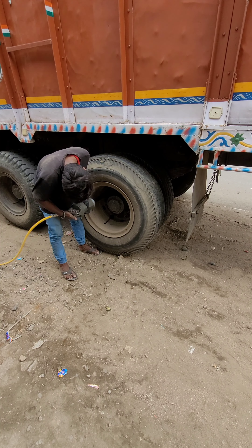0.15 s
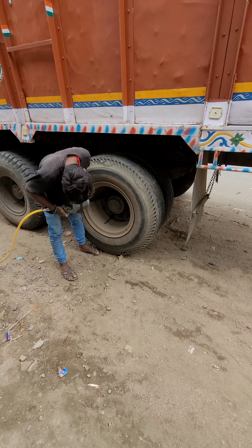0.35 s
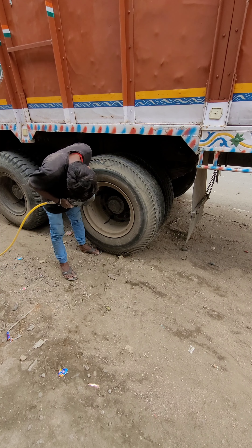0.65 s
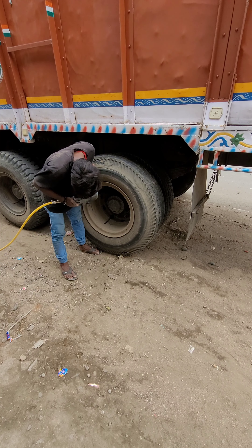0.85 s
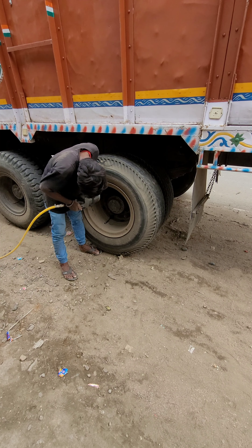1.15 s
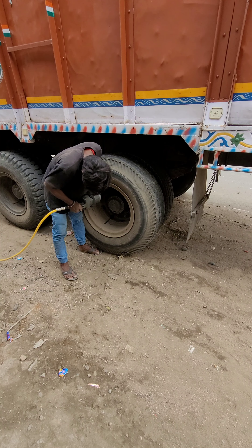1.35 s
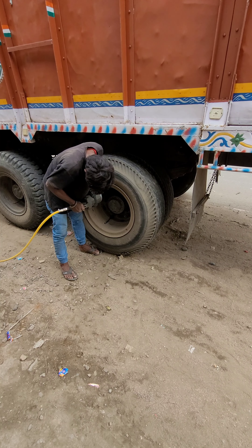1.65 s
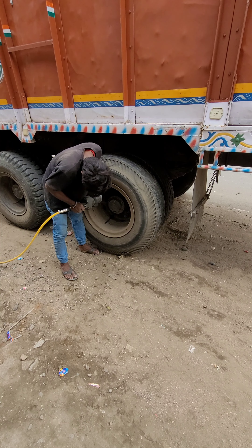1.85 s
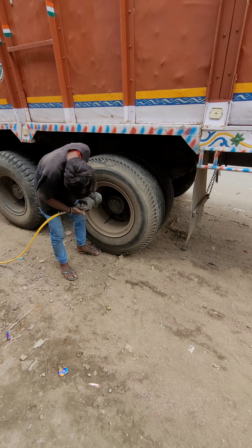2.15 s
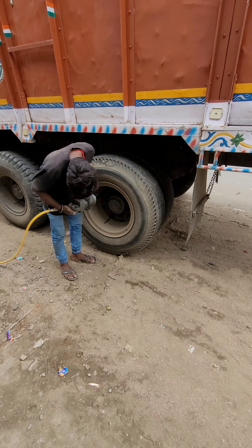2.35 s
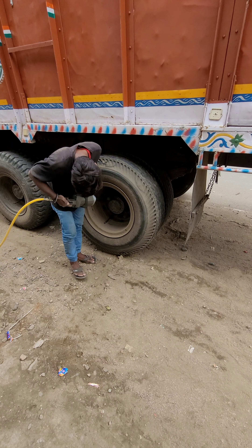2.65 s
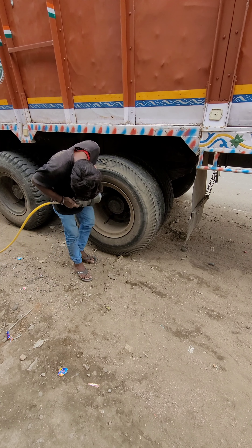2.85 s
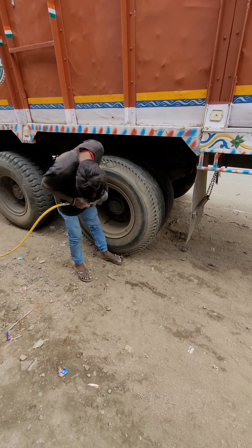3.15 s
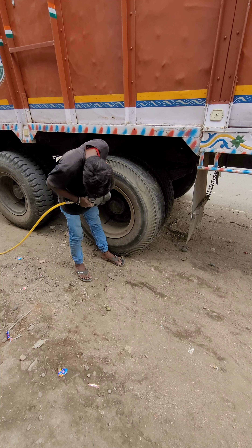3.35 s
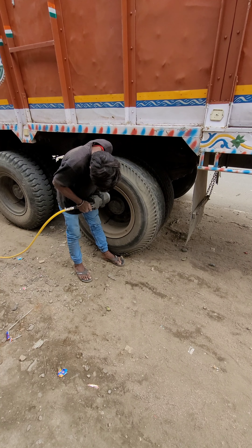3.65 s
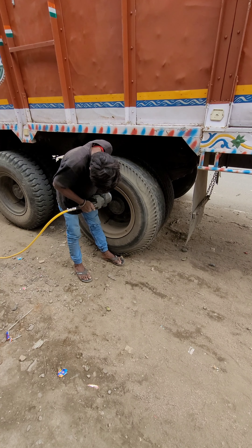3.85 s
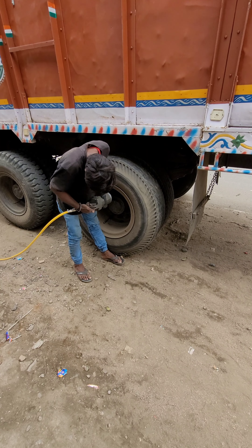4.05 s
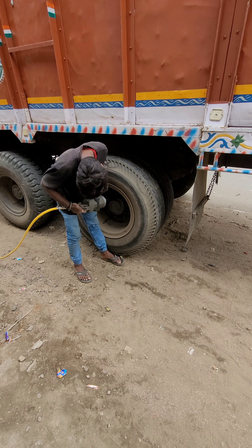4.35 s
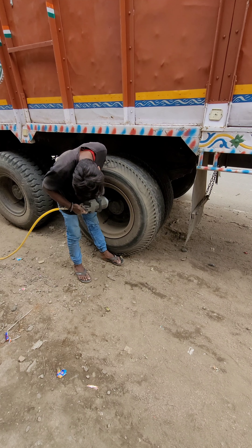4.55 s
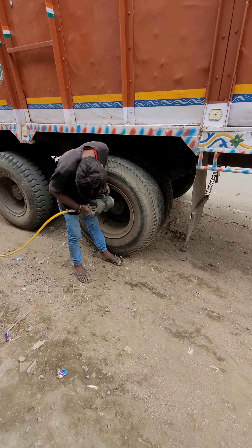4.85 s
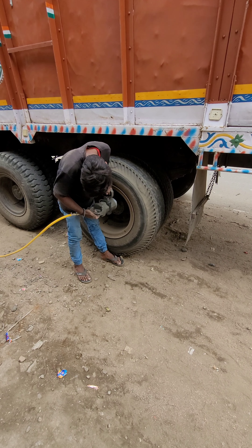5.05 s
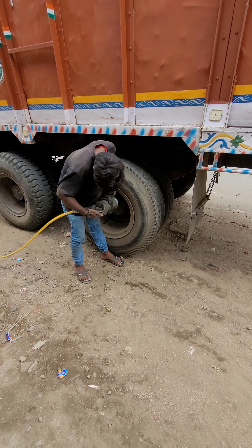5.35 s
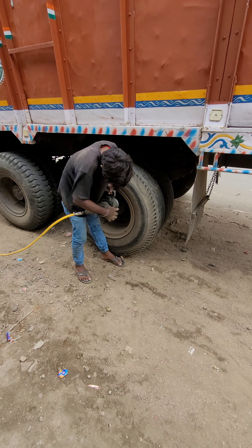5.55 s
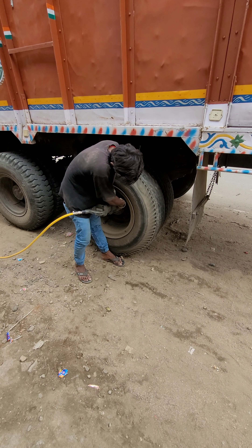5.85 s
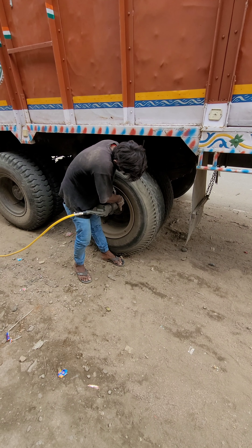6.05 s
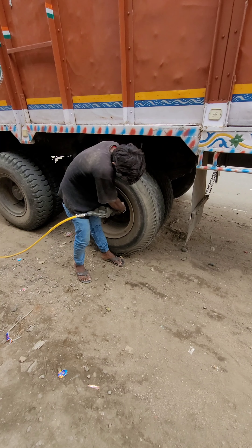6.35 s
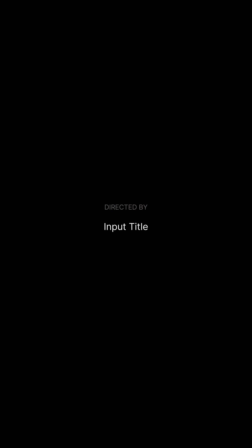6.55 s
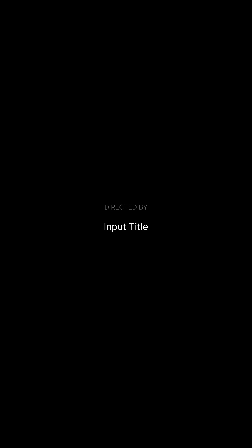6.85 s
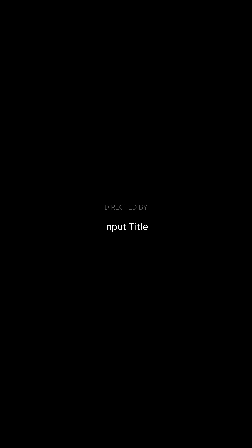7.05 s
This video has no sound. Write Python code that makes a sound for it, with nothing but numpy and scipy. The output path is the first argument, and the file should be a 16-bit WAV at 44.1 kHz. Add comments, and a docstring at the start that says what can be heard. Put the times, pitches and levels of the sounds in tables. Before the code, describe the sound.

A pneumatic impact wrench hammers and hisses in three short bursts on truck wheel nuts, with socket clinks and an engine chugging behind.

```python
"""A pneumatic impact wrench opens with a short burst on a truck wheel nut: vane motor puffs, exhaust
hiss, about ten hammer blows a second. Behind it a one-cylinder engine chugs and a lorry drones.
The socket clinks on the nuts after each burst; the second starts at 1.2 s. From 3 s the lorry changes
gear, and light trigger pulls lead into the third burst at 3.6 s. From 5.2 s the engine grows loud and
the lorry pulls again. A faint squeal rises at 6.35 s; all is cut off at 6.47 s."""
import sys
import numpy as np
from scipy import signal
from scipy.fft import rfft, irfft, next_fast_len
from scipy.io import wavfile
from scipy.ndimage import uniform_filter1d, map_coordinates

SR = 44100
rng = np.random.default_rng(int(sys.argv[2]) if len(sys.argv) > 2 else 0)


def wav_out(sig):
    """Save sig, one row per channel (or a flat mono array), as 16-bit PCM at SR to the path in sys.argv[1]."""
    wavfile.write(sys.argv[1], SR, np.round(np.clip(np.atleast_2d(sig).T, -1, 1) * 32767).astype(np.int16))


N = 317608

# trigger pulls: (press [s], release [s], hiss [dB], puffs [dB], hiss treble [dB], leak until next
# pull [dB], nut ring [dB], puff dip at stall [dB], rotor run-down [dB/s])
TRIGGER_PULLS = [(-.06, 0.122, -22, -26, 2, -63.5, 0.5, 10.5, 350),
                 (1.208, 2.142, -22, -23, 3.5, -55.5, -23.5, 9.5, 258),
                 (3.274, 3.393, -62.5, -35.5, -4, -46, -21, 0, 399),
                 (3.376, 3.55, -49, -30.5, -10, -45.5, -30, 0, 200),
                 (3.538, 3.568, -39, -38.5, 2, -35, -25, 0, 398.5),
                 (3.562, 4.004, -20.5, -21.5, 1, -73.5, -23, 4.5, 258)]
# exhaust chamber: (frequency [Hz], width [Hz], level [dB])
CHAMBER_MODES = [(133.5, 18, -5), (262, 50, -2), (370, 159, -1.5), (440, 70, 0), (502, 40, -6.5)]
# hammer blows: (time [s], level [dB], clang [Hz], clang re blow [dB])
HAMMER_BLOWS = [(.002, -18, 2702, -5), (0.09, -11, 2730, -14.5), (1.353, -8, 4550, -18.5),
                (1.448, -14, 1010, -15), (1.5438, -10.5, 2390, -10), (1.64, -16, 4560, -10),
                (1.738, -19.5, 4600, -15.5), (1.835, -12, 4570, -7.5), (1.937, -11.5, 4590, -16),
                (2.041, -14.5, 2475, -9), (2.142, -10, 4580, -13), (3.629, -15, 3850, -16),
                (3.682, -6.5, 1339, -20.5), (3.7621, -8.5, 890, -10), (3.8434, -13, 2365, -6),
                (3.9282, -10, 2152, -12), (4.009, -12, 3850, -9)]
# ringing steel: (frequency [Hz], level [dB], t60 [s])
WHEEL_MODES = [(1150, -6, .07), (1850, -5.5, .1), (2247, -10.5, .08), (2440, -6, .05), (4590, -5, .15),
               (4775, -13.5, .2), (5168, -10.5, .1), (6223, -10, .1), (6800, -9, .1)]
NUT_MODES = [(2702, -3, .45), (2837, -13, .3), (4070, -14, .15), (4600, -9, .22)]
SOCKET_MODES = [(4016, -12, .1), (7370, -11, .12), (8290, -12, .12), (10210, -12, .4), (10380, -8, .4),
                (11550, -10, .14)]
# knocks per engine cycle: (delay after firing [s], level [dB])
ENGINE_KNOCKS = [(0, 0.5), (.031, -3.5), (0.063, -11)]
# engine casing tones: (multiple of cycle rate [-], level [dB])
CASING_HARMONICS = [(7, -15), (42, -24), (53, -22), (58, -23), (69, -20), (73, -24)]
# lorry coasts, pulls, changes gear, pulls: (time [s], crankshaft [Hz], exhaust [dB])
LORRY_DRIVE = [(0, 35.93, -41.5), (.7, 33.2, -55.5), (1.2, 31.46, -44.5), (2.4, 38.27, -42),
               (3.02, 40.4, -48), (3.1, 37.8, -41.5), (3.5, 29.52, -46), (3.9, 21.66, -48.5),
               (5, 23.5, -52.5), (5.6, 25.32, -38.5), (6.47, 27.19, -39)]
# booming crankshaft orders: (start [s], main [-], second [-], second [dB], third [-], third [dB])
BOOM_ORDERS = [(0, 7, 4, -8, 6, -12), (.8, 8, 7, -3, 9, -9), (1.2, 6, 5, -9, 9, -12),
               (2.3, 8, 6, -6, 9, -12), (3.06, 4, 3, -12, 5, -16), (3.8, 7, 9, -4, 6, -8),
               (5.3, 8, 6, -4, 7, -8), (5.9, 2, 8, -2, 6, -3)]
# gear whine under load: (peak time [s], 1/e half-length [s], level [dB])
GEAR_WHINES = [(2.545, 0.21, -52.5), (2.984, 0.14, -56.5)]
# socket meets nut, and a light trigger click at 1.185 s: (time [s], level [dB], scrape-in [s], clack [Hz],
# clack [dB], ping [Hz], ping [dB], socket ring [dB], nut ring [dB], clunk [dB])
CLINKS_AND_CLICK = [(0.2973, -17.5, 0.0013, 3950, -16, 2702, -21, -18.5, -35, -17),
                    (0.811, -33.5, 0.0015, 5870, -16.5, 7400, -24, -34.5, -31, -8.5),
                    (0.8485, -26.5, 0.0065, 4560, -14.5, 11550, -13.5, -34, -26.5, -6),
                    (1.0911, -28, 0.0015, 4410, -0.5, 7080, 3, -45, -42.5, -11),
                    (1.185, -44.5, 0.0022, 3700, -9, 11900, -1, -36.5, -35, -15),
                    (3.296, -26, 0.0062, 4300, -5.5, 7200, -18, -38.5, -34.5, -1.5),
                    (3.34, -27.5, 0.0026, 3994, -7.5, 7200, -16.5, -25.5, -35, -9),
                    (3.4046, -16, 0.0028, 1028, -4.5, 4470, -2.5, -45.5, -40, 1.5),
                    (4.882, -27, 0.008, 2620, -12, 7250, -17, -28, -21.5, -5.5),
                    (5.007, -25, 0.0083, 2240, -9, 14900, -17, -32, -23, -8.5),
                    (5.051, -35, .005, 4595, -9, 7160, -20, -38, -47, -16)]
# rim and tyre: (frequency [Hz], width [Hz], level [dB])
RIM_MODES = [(261.3, 18, 2.5), (396.3, 65, 2), (519, 22, 0), (848, 27, -11), (955.3, 40, -13.5)]
# noise spectra: (frequency [Hz], relative density [dB])
JET_SPECTRUM = [(30, 2), (150, 7), (700, -5.5), (1200, -5), (2300, -2.5), (3100, -3), (4300, 2), (6900, 2),
                (7900, -1.5), (9100, -5), (10700, 2.5), (13000, 2), (15500, 0)]
CRACK_SPECTRUM = [(100, -12.5), (400, 2.5), (1000, 3.5), (2300, 3.5), (3200, -1.5), (4600, 0), (7000, 2.5),
                  (8500, -5), (15000, -26.5)]
CHUG_SPECTRUM = [(16, -52), (30, -20), (50, -5), (75, 2.5), (109, -8), (261, -2), (421, -2.5), (493, -9),
                 (626, -6.5), (754, -12.5), (861, -8.5), (1150, -16.5), (5240, -35.5), (8920, -44.5),
                 (14800, -45), (16000, -51)]
TRAFFIC_SPECTRUM = [(16, -48), (28, -24.5), (73, 2.5), (103, -17), (153, -3.5), (340, -10.5), (421, -11),
                    (468, -14.5), (839, -22), (1120, -42), (1220, -17.5), (1720, -51.5), (16000, -48.5)]
LEAK_SPECTRUM = [(590, -42.5), (1000, -6.5), (1420, -10), (1870, -14), (2250, -14), (4680, -20.5),
                 (5830, -24), (12300, -24.5), (16000, -31)]
SCRAPE_SPECTRUM = [(200, -9.5), (900, 1.5), (2000, -1.5), (4200, -3.5), (7200, -0.5), (9000, -13),
                   (11000, -7), (15500, -19.5)]
# left-right likeness of noise: (frequency [Hz], correlation [-])
COHERENCE = [(60, 0.88), (250, 1), (500, 0.79), (1000, 0.16), (3000, 0.071), (14000, 0.25)]
# wrench balance: (frequency [Hz], left minus right [dB])
WRENCH_BALANCE = [(60, -3.5), (110, 0.5), (200, 1), (380, -5.5), (700, -4), (1290, -1), (2380, -0.5),
                  (4400, -2.5), (8120, -1.5), (15000, 1)]
# yard reverberation: (frequency [Hz], t60 [s])
YARD_DECAY = [(150, .45), (400, .5), (1000, .45), (4000, .39), (8000, .28), (13000, .2)]


def amp(db):
    """Decibels to gain."""
    return 10 ** (np.asarray(db) / 20)


def unit(x):
    """x at rms 1."""
    return x / np.sqrt(np.mean(x ** 2) + 1e-20)


def along(points, hz):
    """Table value at hz, on a log frequency axis."""
    knots_hz, values = np.transpose(points)
    return np.interp(np.log(hz + 1), np.log(knots_hz + 1), values)


def clock():
    """Sample times [s]."""
    return np.arange(N) / SR


def held(rows):
    """Columns after the time, per sample; each value holds until the next row."""
    rows = np.asarray(rows)
    latest = np.maximum(np.searchsorted(rows[:, 0], clock(), side="right") - 1, 0)
    return rows[latest, 1:].T


def wobble(rate_hz):
    """Smooth random curve with knots at rate_hz."""
    return map_coordinates(rng.standard_normal(int(N * rate_hz / SR) + 4), [clock() * rate_hz])


def filtered(x, response):
    """x through a complex frequency response."""
    size = next_fast_len(N + SR // 2)
    return irfft(rfft(x, size) * response(np.fft.rfftfreq(size, 1 / SR)), size)[..., :N]


def resonances(modes, f):
    """Causal response of modes: (frequency [Hz], width [Hz], level [dB])."""
    return sum((-1) ** k * amp(db) * 1j * f * width_hz / (hz * hz - f * f + 1j * f * width_hz)
               for k, (hz, width_hz, db) in enumerate(modes))


def colour(white, spectrum):
    """Two white signals shaped to stereo at rms 1: bass alike, treble diffuse."""
    def response(hz):
        angle = np.arccos(np.clip(along(COHERENCE, hz), -1, 1)) / 2
        return amp(along(spectrum, hz)) * [np.cos(angle), np.sin(angle)]
    mid, side = filtered(white, response)
    return unit(np.array([mid + side, mid - side]))


def noise(spectrum):
    """Stereo noise at rms 1."""
    return colour(rng.standard_normal((2, N)), spectrum)


def patchy(x, depth_db):
    """x with its colour shifting in small random patches."""
    bins = signal.stft(x, nperseg=512)[2]
    field = uniform_filter1d(rng.standard_normal(bins.shape[1:]), size=3, axis=0)
    field = unit(uniform_filter1d(field, size=7, axis=1))
    return unit(signal.istft(bins * amp(depth_db * field), nperseg=512)[1][:, :N])


def strike(at_s, rise_s, t60_s):
    """Contact envelope: quick swell up to at_s, then decay."""
    age_s = clock() - at_s
    log_gain = np.minimum(age_s / rise_s, -np.log(1000) * age_s / t60_s)
    return np.exp(np.maximum(log_gain, np.log(1e-9)))


def ringing(modes, hits):
    """Steel modes rung by hits (time [s], level [dB]); each is a beating pair of random strength."""
    out, t = np.zeros((2, N + SR)), np.arange(SR // 2) / SR
    for at_s, hit_db in hits:
        for hz, mode_db, t60_s in modes:
            gain = amp(hit_db + mode_db + 2 * rng.standard_normal())
            pair_hz = hz * (1 + .004 * rng.standard_normal((2, 1, 1)))
            phase = rng.uniform(0, 2 * np.pi, (2, 2, 1))
            wave = np.sin(2 * np.pi * pair_hz * t + phase).sum(0) / np.sqrt(2)
            out[:, round(at_s * SR):][:, :len(t)] += gain * amp(-60 * t / t60_s) * wave
    return out[:, :N]


def trigger(open_s=.016, drain_db_per_s=591, lag_s=.03, spin_up_s=.056, sag_db_per_s=4.5):
    """Air and rotor gains: the valve opens, the rotor lags and sags, the hose drains on release."""
    t, air, rotor = clock(), np.zeros(N), np.zeros(N)
    for press_s, release_s, hiss_db, puff_db, *_, run_down_db_per_s in TRIGGER_PULLS:
        age_s, released_s = t - press_s, np.maximum(t - release_s, 0)
        opening = np.clip(age_s / open_s, 0, 1)
        spin = 1 - np.exp(-np.maximum(age_s - lag_s, 0) / spin_up_s)
        air += opening * amp(hiss_db - drain_db_per_s * released_s)
        rotor += spin * amp(puff_db - sag_db_per_s * age_s - run_down_db_per_s * released_s)
    return air, rotor


def stalling(slow_s=.028, hold_s=.014, wind_up_s=.013):
    """Stall depth, 0-1: after each blow the rotor slows, labours and winds up."""
    t, stall = clock(), np.zeros(N)
    for at_s, *_ in HAMMER_BLOWS:
        slowing = np.clip((t - at_s) / slow_s, 0, 1)
        stall += slowing * np.exp(-np.maximum(t - at_s - slow_s - hold_s, 0) / wind_up_s)
    return np.minimum(stall, 1)


def air_motor(vane_hz=120, full_air_db=-22, stall_loss=.4, puff_lead_s=.0055, muffle_hz=1100,
              scatter_db=1.4, swirl_db=-11, flutter_db=1.37, choke_db=.5):
    """Each vane puffs into the exhaust chamber and pulses the jet; blows and light pulls slow it."""
    t, stall = clock(), stalling()
    air, rotor = trigger()
    _, hiss_db, _, treble_db, _, _, dip_db, _ = held(TRIGGER_PULLS)
    speed = np.clip(1 + .018 * (hiss_db - full_air_db), .35, 1) * (1 - stall_loss * stall)
    vanes = np.cumsum(vane_hz * np.maximum(speed + .05 * wobble(60), 0)) / SR
    # the hammer always strikes at the same rotor angle
    last_puffs_s = np.array(HAMMER_BLOWS)[:, 0] - puff_lead_s
    slip = np.unwrap(np.interp(last_puffs_s, t, vanes) % 1, period=1)
    vanes -= np.interp(t, last_puffs_s, slip)
    onsets = np.flatnonzero(np.diff(np.floor(vanes)) > 0)
    puffs = np.zeros(N)
    puffs[onsets] = amp(scatter_db * rng.standard_normal(len(onsets)))
    chamber = lambda f: resonances(CHAMBER_MODES, f) / (1 + 1j * f / muffle_hz)
    putter = unit(filtered(puffs, chamber))
    swirl = unit(filtered(noise([(100, 0)]), chamber))
    body = (putter + amp(swirl_db) * swirl) * rotor * amp(-dip_db * stall)
    hiss = patchy(noise(JET_SPECTRUM), depth_db=2.4)
    treble = filtered(hiss, lambda f: 1 - 1 / (1 + (f / 8000) ** 6))
    jet = hiss + treble * (amp(treble_db) - 1)
    turbulence_db = flutter_db * np.cos(2 * np.pi * vanes) + wobble(130) + .31 * wobble(35)
    return body + jet * air * amp(turbulence_db - choke_db * stall)


def hammer(crack_db=-9.5, wheel_db=-18, nut_db=-18, grit_db=-3, rattle_db=1, rattle_dip_db=5,
           tail_db=.5, contact_hz=1400):
    """Hammer hits anvil: a steel snap, the socket chatters on the nut, wheel and loose nut ring."""
    hits = [(at_s, db) for at_s, db, *_ in HAMMER_BLOWS]
    blows = np.zeros(N)
    for at_s, db in hits:
        snap = strike(at_s + .0035, rise_s=.0007, t60_s=.02) / 3
        tail = strike(at_s + .0018, rise_s=.00081, t60_s=.095)
        blows += amp(db) * (snap + amp(tail_db) * tail)
    air, _ = trigger()
    # the socket shakes as the rotor winds up
    rattle = air * amp(rattle_db + 3 * wobble(150) + 1.2 * wobble(30) - rattle_dip_db * stalling())
    rate_hz = contact_hz * rng.exponential(size=N) * amp(4 * wobble(700))
    contacts = np.diff(np.floor(np.cumsum(rate_hz) / SR), prepend=0)
    chatter = unit(contacts * rng.choice([-1, 1], (2, N)))
    crack = colour(amp(grit_db) * chatter + rng.standard_normal((2, N)) / 2, CRACK_SPECTRUM)
    *_, loose_db, _, _ = held(TRIGGER_PULLS)
    nut = ringing(NUT_MODES, [(at_s, db + loose_db[round(at_s * SR)]) for at_s, db in hits])
    wheel = ringing(WHEEL_MODES, hits)
    clang = sum(ringing([(hz, clang_db, .075)], [(at_s, db)]) for at_s, db, hz, clang_db in HAMMER_BLOWS)
    return amp(crack_db) * (blows + rattle) * crack + amp(wheel_db) * wheel + clang + amp(nut_db) * nut


def cycle_noise(cycle_s, odd_db, scatter=.42):
    """Noise nearly alike in each engine cycle; two crank turns a cycle weaken the odd harmonics."""
    size = round(cycle_s * SR)
    k = np.arange(size // 2 + 1)
    cycle = irfft(amp(odd_db * (k % 2)) * np.exp(2j * np.pi * rng.random((2, len(k)))), size)
    return unit(cycle[:, np.arange(N) % size]) + scatter * rng.standard_normal((2, N))


def engine_gain(quiet_db=-49, loud_db=-28, early_db=-19.5, settled_s=.8, swell_at_s=5.194, swell_s=.5):
    """The engine fades in, stays quiet, then grows loud and levels off."""
    t = clock()
    swell = 1 - np.exp(-np.maximum(t - swell_at_s, 0) / swell_s)
    quiet = amp(quiet_db + early_db * np.clip(1 - t / settled_s, 0, 1))
    return quiet * (1 - swell) + amp(loud_db) * swell


def engine(cycle_s=.08222, firing_s=5.516, knock_db=-2, knock_decay_s=.0094, between_db=-10, hiss_db=-13):
    """One cylinder: each cycle has a thump, three knocks that ring the casing, and a puff of hiss."""
    t = clock()
    angle = lambda delay_s: 2 * np.pi * (t - firing_s - delay_s) / cycle_s
    stroke = lambda delay_s, width_rad: np.exp((np.cos(angle(delay_s)) - 1) / width_rad ** 2)
    decay = lambda delay_s, decay_s: np.exp(-((t - firing_s - delay_s) % cycle_s) / decay_s)
    silencer_modes = [(51, 5, -1.5), (130, 17, -1.5), (215, 69, -6), (400, 60, -5.5)]
    casing_modes = [(420, 63, -4), (527, 17, .5), (630, 29, 1), (839, 28, 6.5), (1230, 140, -2)]
    low = lambda f: 1 / (1 + (f / 380) ** 4)
    silencer = lambda f: low(f) * (1 + abs(resonances(silencer_modes, f)))
    casing = lambda f: (1 - low(f)) / (1 + (f / 1900) ** 2) * (1 + abs(resonances(casing_modes, f)))
    exhaust = colour(cycle_noise(cycle_s, odd_db=-4), CHUG_SPECTRUM)
    thump = unit(filtered(exhaust, silencer) * amp(2 * stroke(.009, 1.9)))
    hits = amp(between_db) + sum(amp(db) * decay(delay_s, knock_decay_s) for delay_s, db in ENGINE_KNOCKS)
    impacts = cycle_noise(cycle_s, odd_db=-2) * hits * amp(1.2 * wobble(25))
    knocks = unit(filtered(colour(impacts, CHUG_SPECTRUM), casing))
    hiss = noise([(500, -17.5), (1500, 1), (2300, -4.5), (3200, -7.5), (4800, -6), (8500, -16.5),
                  (15000, -26)]) * amp(2 * stroke(.002, .45))
    puff = noise([(3000, -31), (9000, -12.5), (12000, 2), (15000, 2)]) * amp(5 * stroke(.069, 1.1) - 11)
    tones = sum(amp(db + wobble(11)) * np.sin(2 * np.pi * (k * t / cycle_s + rng.random()))
                for k, db in CASING_HARMONICS)
    singing = np.sqrt(2) * tones * unit(.5 + decay(0, .03))  # each firing rings the casing anew
    chug = unit(thump + amp(knock_db) * knocks)
    return engine_gain() * (chug + singing + amp(hiss_db) * unit(hiss + puff))


def lorry(other_db=-18, firing_db=-12, teeth=36):
    """Crankshaft orders drone, three booming above the rest; a gear whine follows the shaft."""
    t = clock()
    times_s, *columns = np.transpose(LORRY_DRIVE)
    shaft_hz, exhaust_db = [np.interp(t, times_s, column) for column in columns]
    angle = 2 * np.pi * np.cumsum(shaft_hz * (1 + .003 * wobble(14))) / SR
    main, second, second_db, third, third_db = held(BOOM_ORDERS)
    drone = np.zeros(N)
    for k in range(2, 13):
        boom = (k == main) + amp(second_db) * (k == second) + amp(third_db) * (k == third)
        base = amp(firing_db if k == 2 else other_db) * (1 - k / 16)
        gain = uniform_filter1d(boom + base, size=SR // 10) * amp(1.6 * wobble(24))
        drone += gain * np.sin(k * angle + rng.uniform(0, 2 * np.pi))
    load = sum(amp(db) * np.exp(-((t - at_s) / half_s) ** 2) for at_s, half_s, db in GEAR_WHINES)
    whine = load * amp(3.5 * wobble(45)) * np.sin(teeth * angle + .7 * wobble(90))
    return amp(exhaust_db) * unit(drone) + whine


def traffic(level_db=-52):
    """Distant traffic: a wavering rumble."""
    return amp(level_db + .92 * wobble(6.3)) * noise(TRAFFIC_SPECTRUM)


def air_leak():
    """Air seeps at the wrench, at a new level after each pull."""
    *_, leak_db, _, _, _ = held(TRIGGER_PULLS)
    return amp(uniform_filter1d(leak_db, size=SR // 10) + .7 * wobble(13)) * noise(LEAK_SPECTRUM)


def socket(clack_db=-10, clunk_db=33, thud_db=-11):
    """The socket scrapes on, clacks and pings; bouncing, it rings; seating, it rings nut and rim."""
    grit = noise(SCRAPE_SPECTRUM) * unit(amp(2.2 * wobble(600)))
    band = lambda hz, damping: unit(signal.lfilter(*signal.iirpeak(hz, 1 / damping, fs=SR), grit))
    clacks, knocks, pushes = np.zeros((2, N)), np.zeros(N), np.zeros(N)
    bounces, seatings = [], []
    for at_s, db, rise_s, hz, tone_db, ping_hz, ping_db, socket_db, nut_db, seat_db in CLINKS_AND_CLICK:
        clacks += amp(db) * strike(at_s, rise_s, t60_s=.069) * (grit + amp(tone_db) * band(hz, .07))
        clacks += amp(db + ping_db) * strike(at_s, rise_s, t60_s=.045) * band(ping_hz, .02)
        knocks += amp(db + seat_db) * strike(at_s + .015, rise_s + .004, t60_s=.13)
        pushes[round(at_s * SR)] = amp(db + seat_db)
        bounces.append((at_s, db + socket_db))
        seatings.append((at_s, db + nut_db))
    thud = knocks * noise([(80, -19.5), (260, -9), (480, -5.5), (750, -20.5), (2000, -40.5)])
    clunk = filtered(pushes, lambda f: resonances(RIM_MODES, f))
    rings = ringing(SOCKET_MODES, bounces) + ringing(NUT_MODES, seatings)
    return amp(clack_db) * clacks + rings + amp(clunk_db) * clunk + amp(thud_db) * thud


def squeal(start_s=6.35, start_hz=1940, rise_hz_per_s=1800, attack_s=.035, level_db=-44):
    """A thin, unsteady rising tone from the road."""
    age_s = np.maximum(clock() - start_s, 0)
    hz = (start_hz + rise_hz_per_s * age_s) * (1 + .0074 * wobble(150))
    gain = np.minimum(age_s / attack_s, 1) * amp(level_db + 2 * wobble(70))
    return gain * np.sin(2 * np.pi * np.cumsum(hz) / SR)


def yard(x, low_cut_hz=250):
    """Scatter from truck body and ground, 5 ms late; each frequency decays at its own rate."""
    hz, t, bins = signal.stft(rng.standard_normal((2, SR // 2)), SR, nperseg=256)
    tail = signal.istft(bins * amp(-60 * t / along(YARD_DECAY, hz)[:, None]), SR, nperseg=256)[1]
    response = np.pad(tail, ((0, 0), (SR // 200, 0))) / np.linalg.norm(tail[0])
    wet = signal.fftconvolve(x, response, axes=1)[:, :N]
    return filtered(wet, lambda f: f / (f + low_cut_hz))


def scene(wet_db=-10, wrench_lead_s=52e-6, background_lead_s=100e-6, background_balance_db=-2.3):
    """Wrench with yard scatter over a dry background; both reach the left ear first."""
    ears = np.array([[.5], [-.5]])
    lead = lambda f, lead_s: np.exp(2j * np.pi * f * ears * lead_s)
    wrench = air_motor() + hammer() + socket()
    wrench += amp(wet_db) * yard(wrench)
    wrench = filtered(wrench, lambda f: amp(ears * along(WRENCH_BALANCE, f)) * lead(f, wrench_lead_s))
    background = (engine() + lorry() + traffic() + air_leak() + squeal()) * amp(ears * background_balance_db)
    return wrench + filtered(background, lambda f: lead(f, background_lead_s))


def record(dry, ceiling=.85, cut_s=6.467, top_hz=16000):
    """Soft peak limit, cut-off with a 5 ms fade, steep low-pass."""
    rounded = dry / (1 + (dry / ceiling) ** 6) ** (1 / 6)
    gate = np.clip((cut_s - clock()) / .005 + 1, 0, 1)
    return filtered(rounded * gate, lambda hz: 1 / (1 + (hz / top_hz) ** 160))


dry = scene()
out = record(dry)
wav_out(out)
```